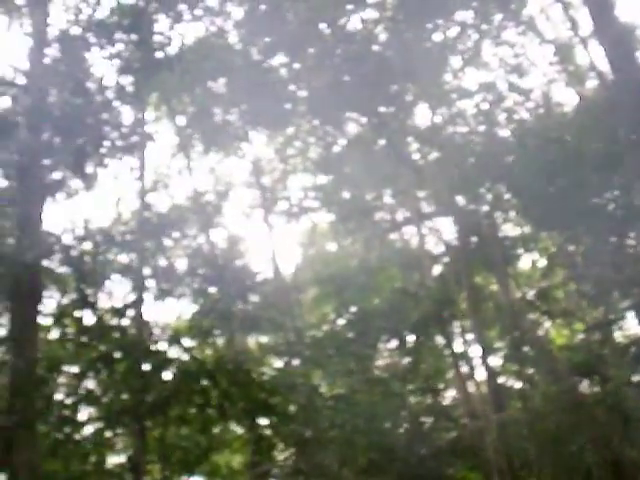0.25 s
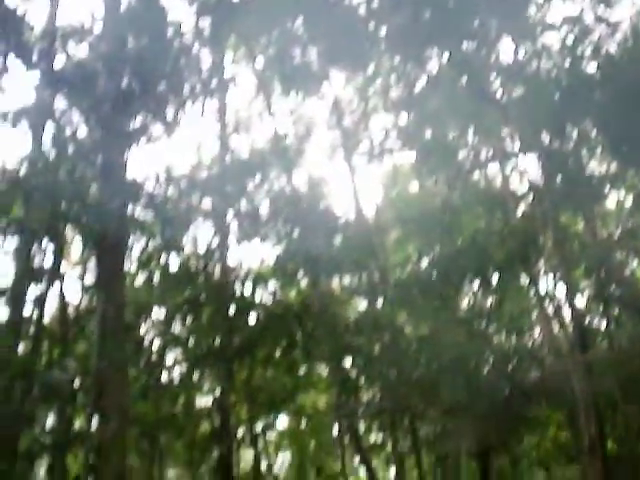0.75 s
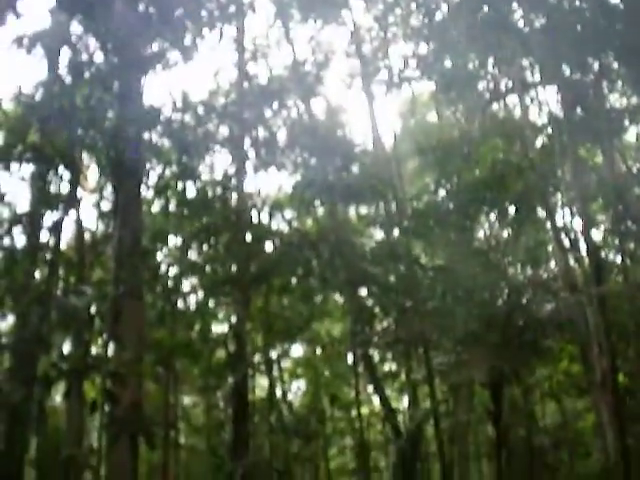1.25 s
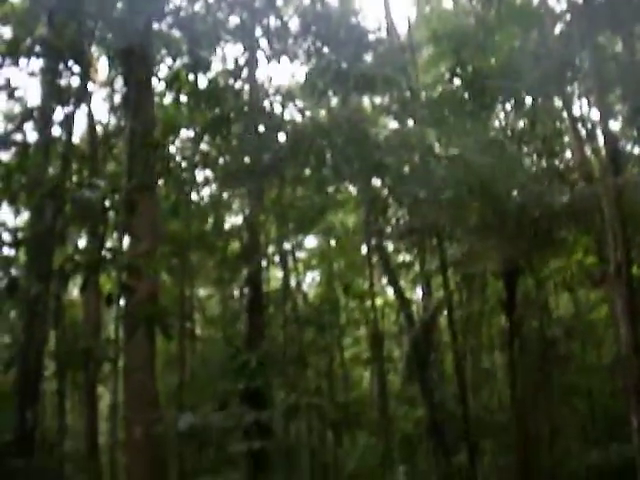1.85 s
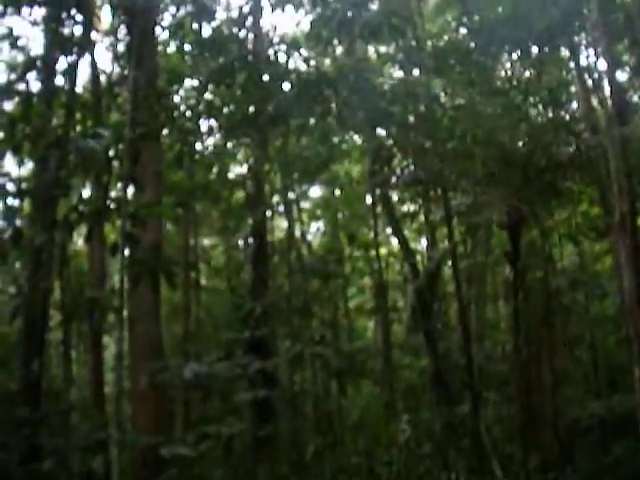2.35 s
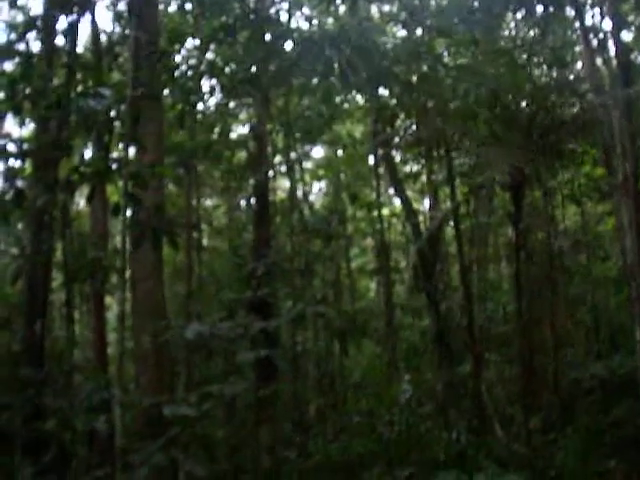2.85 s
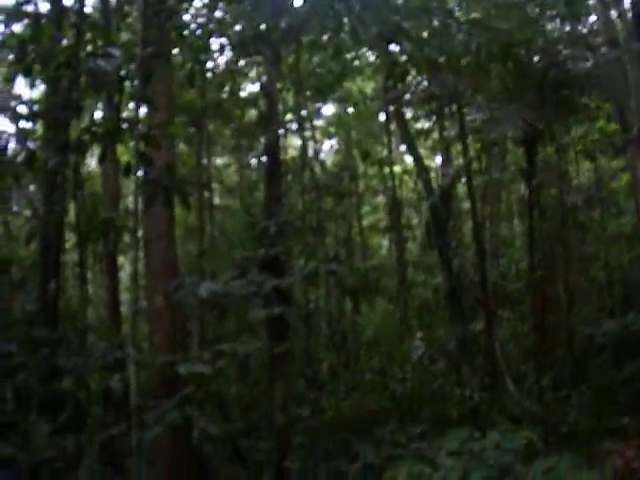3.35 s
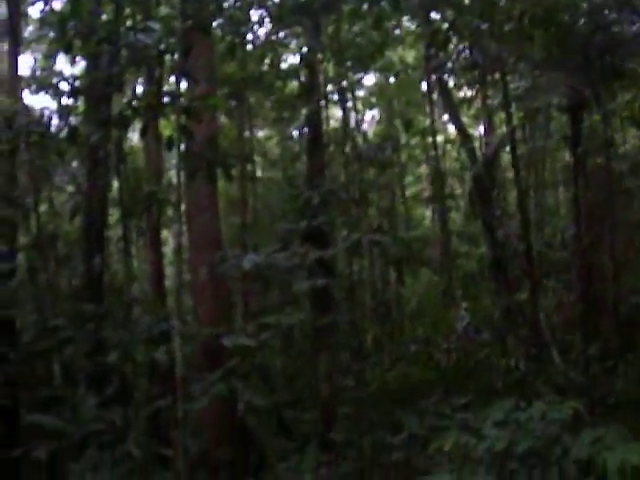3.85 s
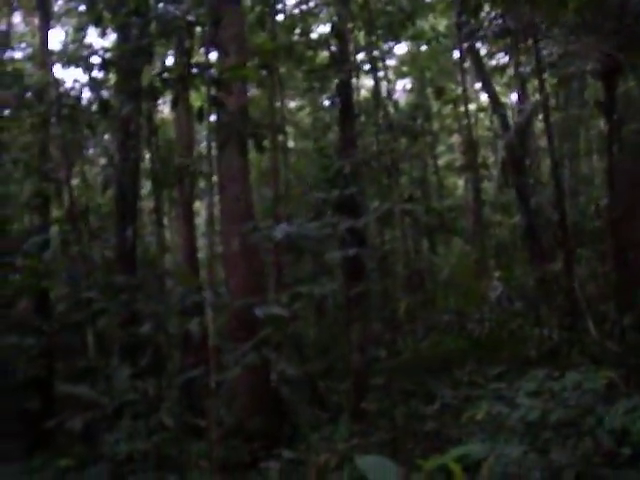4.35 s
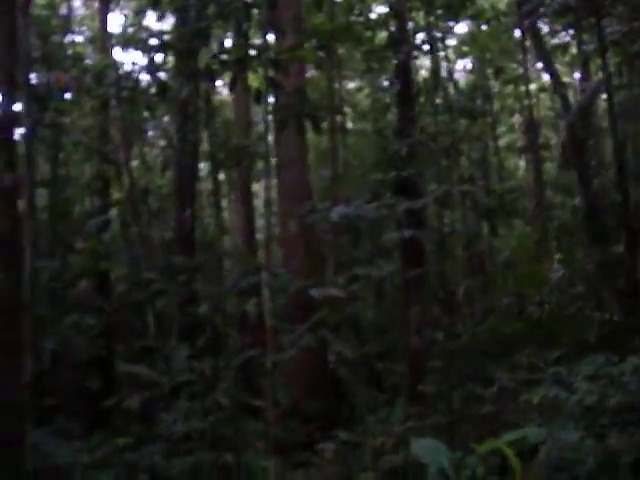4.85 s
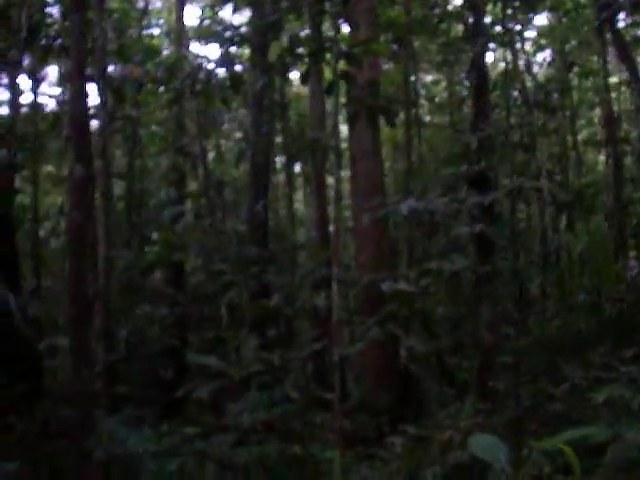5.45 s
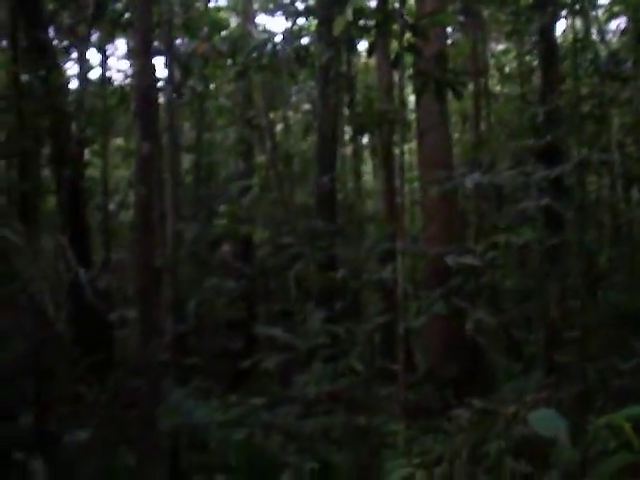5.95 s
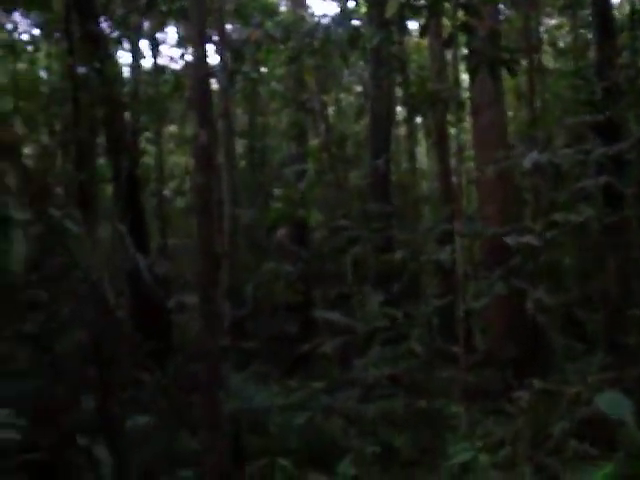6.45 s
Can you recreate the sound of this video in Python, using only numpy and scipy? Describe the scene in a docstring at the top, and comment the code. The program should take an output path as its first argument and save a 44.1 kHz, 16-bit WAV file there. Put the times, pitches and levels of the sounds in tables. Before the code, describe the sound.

A rainforest at dusk, heard in mono through a small camera microphone. From 0 s a dense, shrill chorus of far cicadas holds near 6.3 kHz, blurred by echoes among trunks, easing by a few decibels until about 4 s, then nearly steady. A nearer cicada rasps at almost the same pitch in seven to nine chirps a second, pushing harder near 0.35 and 1.2 s. It dips briefly at 3.3 s, sings loudest from 3.4 to 4 s, then drops sharply, tired, with one short push near 4.9 s. A slightly lower group swells faintly every 1.2 s. Tiny snaps of twigs or drips fall at 0.56, 2.66 and 2.8 s, a sharper bright cluster at 5.76 s, and faint ones afterwards. Leaves stir softly from 6 s. Even hiss, a soft 30-per-second buzz and a very thin high whine persist throughout.

```python
"""Cicadas sing shrilly in a rainforest at dusk, heard through a small mono camera.
Clicks from many far insects, blurred by echoes, make a band near 6.3 kHz; a lower group swells beneath.
A nearer cicada's clicks ring its body in seven to nine chirps a second; later it tires.
Twigs and drips are short sine snaps, and leaves are grainy noise.
The camera adds noise as hiss, current pulses as a picture-rate buzz, and two sines as a thin whine."""
import sys
import numpy as np
from scipy import signal
from scipy.fft import rfft, irfft, next_fast_len
from scipy.io import wavfile
from scipy.ndimage import uniform_filter1d

SR = 44100
rng = np.random.default_rng(int(sys.argv[2]) if len(sys.argv) > 2 else 0)


def persist_wave(psi):
    """Save psi, clipped to +-1, as 16-bit WAV."""
    counts = np.round(np.clip(psi, -1, 1) * 32767).astype(np.int16)
    wavfile.write(sys.argv[1], SR, np.atleast_2d(counts).T)


N = 295007
TIME = np.arange(N) / SR  # seconds

# loudness of the far chorus, which eases off, then nearly holds: [t/s, level/dB]
CHORUS_LEVEL = [(0, -45.8), (1.2, -46.5), (2, -48), (4.3, -49.5), (5.3, -49), (6.69, -49.7)]
# tone colour of the far chorus: [f/Hz, relative level/dB]
CHORUS_SPECTRUM = [(4900, -40), (5500, -19), (5780, -11.5), (5905, -4.5), (6000, -2.5), (6150, .7),
                   (6290, 1), (6420, -3), (6540, -3.7), (6650, -1.8), (6800, -3), (7050, -9), (7190, -19),
                   (8000, -42)]

# pace of the near cicada: [t/s, chirps per second]
CHIRP_RATE = [(0, 8.4), (.7, 8.4), (1.4, 7.0), (2.2, 7.7), (2.7, 8.6), (3.6, 7.0), (4.3, 7.2), (5, 8.3)]
# its effort: even song, a brief rest, a loud last run, then tired; before a trim: [t/s, level/dB]
CHIRP_LEVEL = [(0, -48.5), (1.2, -47), (3.1, -46), (3.27, -53), (3.4, -44), (4, -43), (4.2, -54.5),
               (5.2, -55), (6.69, -55.5)]
# moments when it pushes harder: [middle t/s, extra level/dB]
PUSHES = [(.35, 5), (1.22, 5.5), (4.9, 7)]
PUSH_LENGTH_S = .26
# resonances of its hollow body: [f/Hz, width of each of two passes/Hz, relative level/dB]
BODY_RESONANCES = [(6365, 300, 0), (6640, 200, -16), (6830, 380, -15)]
# one chirp peaks at CHIRP_PEAK_S; each fills CHIRP_SHARE of its cycle, over a steady low rasp
CHIRP_PEAK_S, CHIRP_SHARE, BETWEEN_CHIRPS_DB = 0.3514, 0.93, -11.5

# colour of the air and microphone hiss: [f/Hz, relative level/dB]
HISS_SPECTRUM = [(10, -2), (25, 3), (100, 0), (240, -2.5), (500, -4.5), (1000, -8), (2000, -12.5),
                 (4000, -16.5), (5200, -18), (7400, -22.5), (8000, -26), (9000, -27.5)]
HISS_DB = -47.5  # rms, before the microphone's roll-off
# electronic whine, before the microphone's roll-off: [f/Hz, rms level/dB]
WHINE_TONES = [(7498.4, -67.5), (8501.6, -73.5)]
PICTURE_RATE_HZ = 29.994

# effort of the lower-pitched group in its swells, before a trim: [t/s, level/dB]
LOW_LEVEL = [(.4, -62), (1.6, -63), (2.8, -57.5), (4.1, -58.5), (6.6, -63.5)]
# tone colour of that group: [f/Hz, relative level/dB]
LOW_SPECTRUM = [(5000, -30.5), (5350, -10), (5520, -5), (5700, -1.5), (6100, -20.5)]
LOW_FIRST_PEAK_S, LOW_PERIOD_S, LOW_LENGTH_S = .39, 1.22, 0.54

# twigs and drips: [t/s, envelope peak level/dB, f/Hz, spread/s, scatter level relative to the snap/dB]
SNAPS = [(.5613, -32, 8100, 0.00011, -8), (2.6597, -29.5, 1900, 0.00029, -4),
         (2.812, -37, 3600, 0.00019, -7), (5.7605, -26, 4800, .00018, -11), (5.7617, -30, 5900, .00016, -7),
         (5.7676, -35, 7000, .0002, -6), (5.982, -40, 3600, .0002, 1), (6.361, -40, 3100, 0.00028, 3),
         (6.48, -40, 3600, .0003, 1)]

# faint stirrings of leaves: [middle t/s, level/dB]
STIRRINGS = [(6.04, -58), (6.36, -62), (6.63, -64)]
# tone colour of the leaves: [f/Hz, relative level/dB]
LEAF_SPECTRUM = [(200, -18), (600, -2), (1500, -3.5), (3500, -13.5), (7000, -23)]
STIRRING_LENGTH_S, LEAVES_REST_DB = .28, -74

# treble roll-off of the microphone: [f/Hz, level/dB]
MICROPHONE_RESPONSE = [(7400, 0.5), (8000, -1.5), (8500, -9.5), (8900, -20)]
TOP_EDGE_HZ = 9119


def gain_of(db):
    """Turns decibels into an amplitude factor."""
    return 10 ** (np.asarray(db) / 20)


def evened(x):
    """Scales a sound to an average strength (rms) of 1."""
    return x / np.sqrt(np.mean(x ** 2) + 1e-20)


def level(curve):
    """Turns a time and dB curve into a gain for every sample."""
    return gain_of(np.interp(TIME, *np.transpose(curve)))


def coloured(x, points):
    """Filters a sound by frequency, joining the dB points along a log frequency scale."""
    hz, db = np.transpose(points)
    bins = np.fft.rfftfreq(next_fast_len(N + 4096), 1 / SR)
    gain = gain_of(np.interp(np.log(bins + 1), np.log(hz + 1), db))
    size = 2 * (len(bins) - 1)
    return irfft(rfft(x, size) * gain, size)[:N]


def drift(rate):
    """Joins random values, rate of them a second, into a wandering curve of rms 1."""
    return evened(np.interp(TIME * rate, np.arange(4096), rng.standard_normal(4096)))


def arch(offset, length):
    """A smooth swell of height 1 and the given length, centred on offset 0."""
    return np.cos(np.pi * np.clip(offset / length, -.5, .5))


def throb(cycles, share):
    """One arch at every whole number of cycles, filling a share of the cycle."""
    return arch(cycles - np.round(cycles), share)


def trunks(x, t60):
    """Trunks and leaves scatter sound into random echoes that fall 60 dB in t60 seconds."""
    t = TIME[:SR // 2]
    tail = rng.standard_normal(len(t)) * gain_of(-60 * t / t60)
    unit_tail = tail / np.linalg.norm(tail)
    return signal.fftconvolve(x, unit_tail)[:N]


def tymbal(rate, jitter, uneven_db):
    """The ribs of a cicada's drum buckle in an uneven train, each buckle giving a click."""
    wobble = 1 + jitter * drift(150) + .04 * drift(3)
    turns = np.cumsum(rate * np.maximum(wobble, .1)) / SR
    # a click falls wherever the count passes a whole number
    clicks = np.diff(np.floor(turns), prepend=0)
    return clicks * gain_of(uneven_db * rng.standard_normal(N))


def far_chorus(count=14, direct_db=0):
    """Many cicadas throb unevenly at their own click rates, blurred by forest echoes."""
    voices = np.zeros(N)
    for rate in np.geomspace(85, 380, count):  # clicks per second
        clicks = tymbal(rate, jitter=.22, uneven_db=0.5)
        throbbing = clicks * gain_of(3.2 * drift(16))
        voices += evened(gain_of(direct_db) * throbbing + trunks(throbbing, t60=0.41))
    return level(CHORUS_LEVEL) * evened(coloured(voices, CHORUS_SPECTRUM))


def resonate(x, hz, width):
    """A body resonance rings at one pitch; two passes make its sides steep."""
    r = np.exp(-np.pi * width / SR)
    pole = r * np.exp(2j * np.pi * hz / SR)
    return 2 * signal.lfilter([(1 - r) ** 2], np.poly([pole, pole]), x).real


def chirping():
    """The near cicada's loudness follows its chirps, its effort and its harder pushes."""
    cycles = np.cumsum(np.interp(TIME, *np.transpose(CHIRP_RATE))) / SR
    cycles_at_peak = np.interp(CHIRP_PEAK_S, TIME, cycles)
    chirps = throb(cycles - cycles_at_peak, CHIRP_SHARE)
    push_db = sum(db * arch(TIME - middle, PUSH_LENGTH_S) for middle, db in PUSHES)
    pulsing = np.maximum(chirps, gain_of(BETWEEN_CHIRPS_DB))
    return level(CHIRP_LEVEL) * gain_of(push_db) * pulsing


def near_cicada(gain_db=-2.3):
    """Two tymbals click and ring the hollow body; the clicks swell into chirps."""
    clicks = tymbal(420, jitter=.4, uneven_db=2) - tymbal(370, jitter=.4, uneven_db=2)
    rasp = np.zeros(N)
    for k, (hz, width, db) in enumerate(BODY_RESONANCES):
        delayed = np.roll(clicks, 40 * k)  # each resonance starts 40 samples after the last
        rasp += gain_of(db) * resonate(delayed, hz, width)
    # the muscle drives the drums with even force through a chirp
    strength = np.sqrt(uniform_filter1d(rasp ** 2, size=1300) + 1e-16)
    song = gain_of(gain_db) * chirping() * rasp / strength
    return song + gain_of(-14) * trunks(song, t60=.3)


def hiss_and_whine():
    """Air and microphone noise hisses evenly while the electronics whine on two steady tones."""
    hiss = gain_of(HISS_DB) * evened(coloured(rng.standard_normal(N), HISS_SPECTRUM))
    # the root of 2 turns an rms level into a sine's peak
    whine = sum(gain_of(db) * np.sqrt(2) * np.sin(2 * np.pi * hz * TIME) for hz, db in WHINE_TONES)
    return hiss + whine


def frame_buzz(pulse_db=-37.0, width_s=0.0034, long_width_s=0.0079, end_s=0.003085,
               rise_s=0.0015, leak_hz=15, soft_hz=620, count=15):
    """The camera draws a pulse of current for each picture, a longer one about twice a second."""
    frames = (TIME - end_s) * PICTURE_RATE_HZ
    number = np.ceil(frames)
    is_long = number % count == 11  # one picture in every count
    uneven = np.exp(.15 * rng.standard_normal(512)[number.astype(int)])
    widths = np.where(is_long, long_width_s, width_s * uneven)
    # the current builds up, then cuts off at once
    time_left = (number - frames) / PICTURE_RATE_HZ
    age = np.maximum(widths + rise_s / 2 - time_left, 0)
    pulses = 1 - np.exp(-age / rise_s)
    # the coupling capacitor makes each pulse undershoot and creep back
    shape = signal.butter(1, [leak_hz, soft_hz], "bandpass", fs=SR)
    return gain_of(pulse_db) * signal.lfilter(*shape, pulses - pulses.mean())


def low_singers(gain_db=-2, lull_db=-64, count=7):
    """A distant, lower group swells together, each voice scattered along its own path through the trees."""
    voices = np.zeros(N)
    for rate in np.geomspace(110, 260, count):  # clicks per second
        voices += trunks(tymbal(rate, jitter=.4, uneven_db=4), t60=.3)
    swell = throb((TIME - LOW_FIRST_PEAK_S) / LOW_PERIOD_S, LOW_LENGTH_S / LOW_PERIOD_S)
    effort = gain_of(lull_db) + level(LOW_LEVEL) * swell
    return gain_of(gain_db) * effort * evened(coloured(voices, LOW_SPECTRUM))


def ticks():
    """Twigs and drips give tiny sine snaps, each scattered briefly by the leaves."""
    out = np.zeros(N)
    for s, db, hz, spread, scatter_db in SNAPS:
        age = TIME - s
        envelope = np.exp(-np.minimum((age / spread) ** 2, 50))
        snap = gain_of(db) * envelope * np.sin(2 * np.pi * hz * age)
        out += snap + gain_of(scatter_db) * trunks(snap, t60=0.11)
    return out


def leaves():
    """Foliage stirs softly as noise whose quick changes in strength make it grainy."""
    grains = rng.standard_normal(N) * gain_of(4 * np.tanh(drift(120)))
    stir = gain_of(LEAVES_REST_DB)
    for middle, db in STIRRINGS:
        stir = stir + gain_of(db) * arch(TIME - middle, STIRRING_LENGTH_S)
    return stir * evened(coloured(grains, LEAF_SPECTRUM))


def scene():
    """Adds forest and camera sounds, the same in both channels."""
    insects = far_chorus() + near_cicada() + low_singers()
    camera = hiss_and_whine() + frame_buzz()
    mono = insects + camera + ticks() + leaves()
    return np.array([mono, mono])


def record(dry):
    """The microphone dulls the treble, then a steep filter cuts everything above its edge."""
    dull = np.array([coloured(channel, MICROPHONE_RESPONSE) for channel in dry])
    band_limit = signal.firwin(511, TOP_EDGE_HZ, window=("kaiser", 9), fs=SR)
    return signal.oaconvolve(dull, band_limit[None], "same")


dry = scene()
out = record(dry)
persist_wave(out)
```